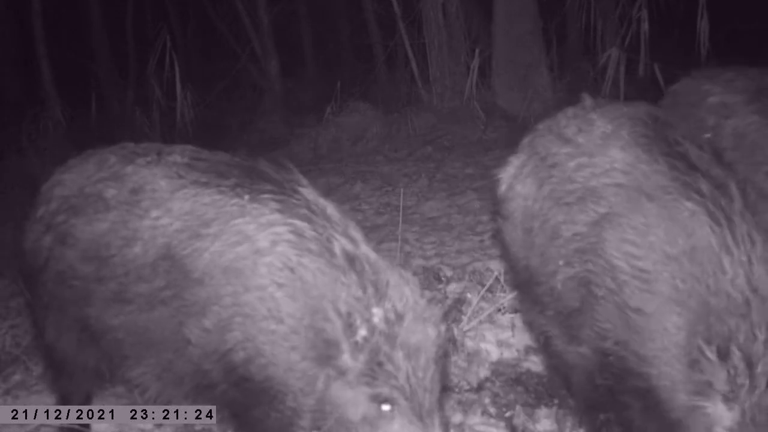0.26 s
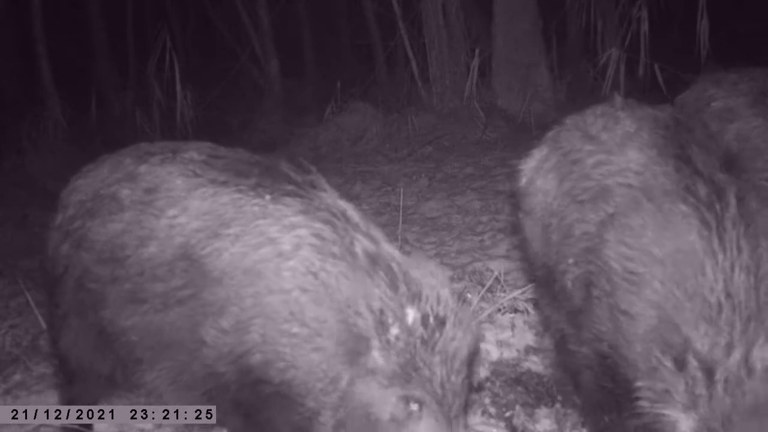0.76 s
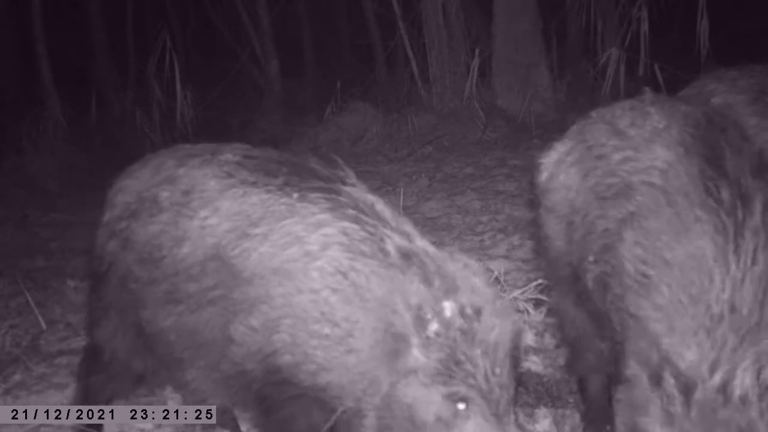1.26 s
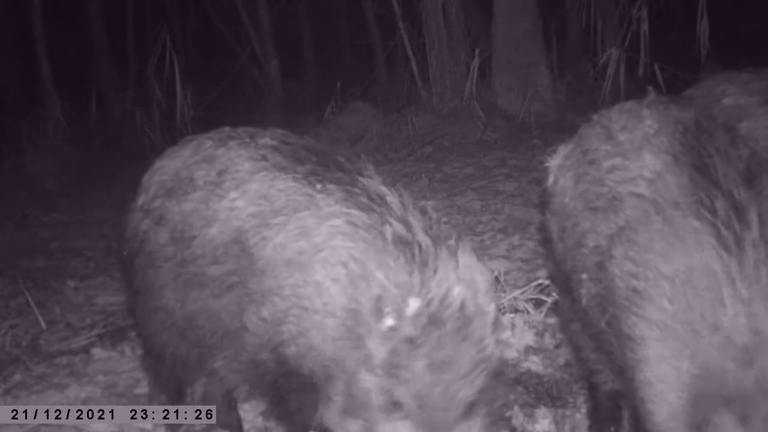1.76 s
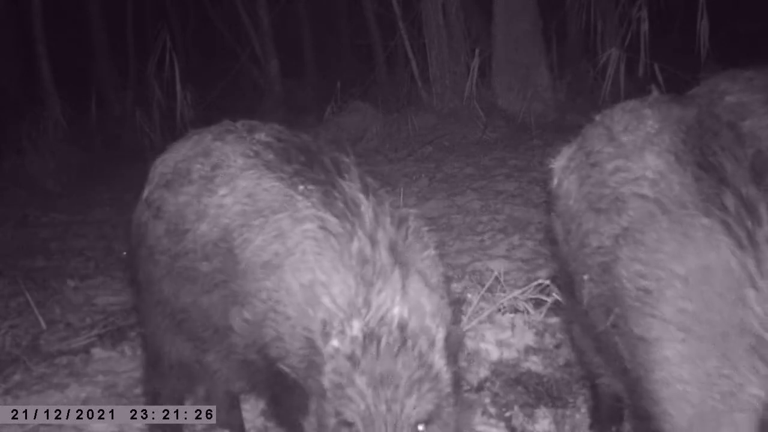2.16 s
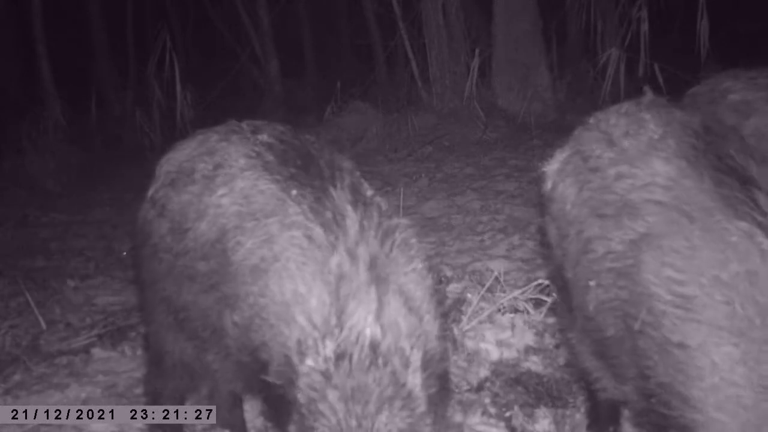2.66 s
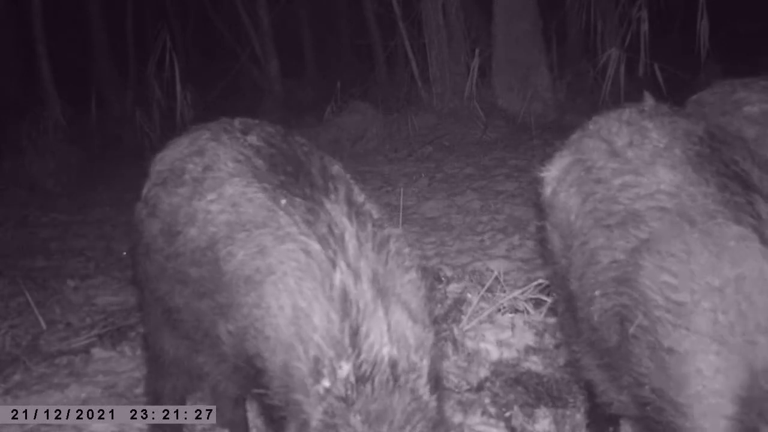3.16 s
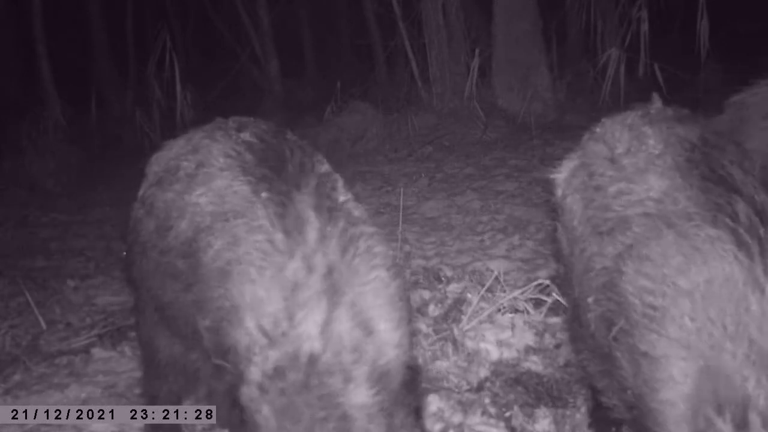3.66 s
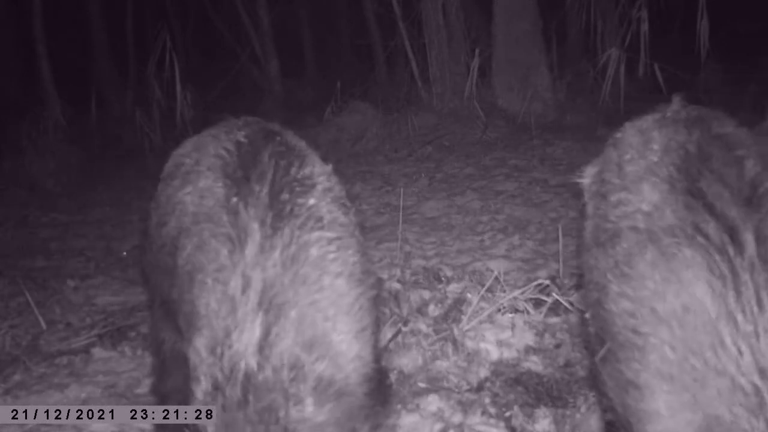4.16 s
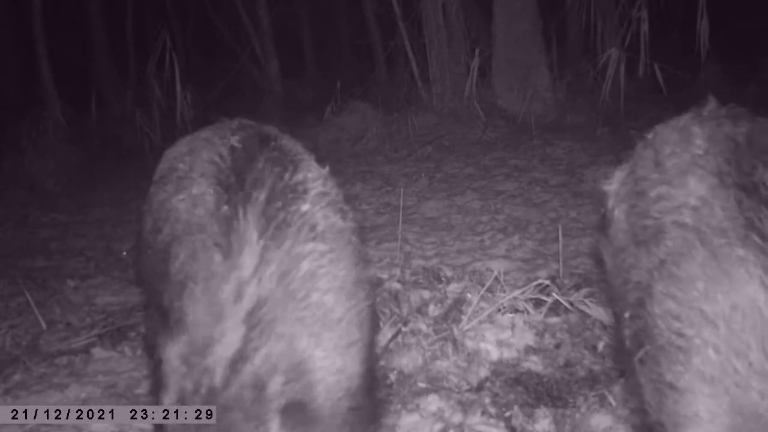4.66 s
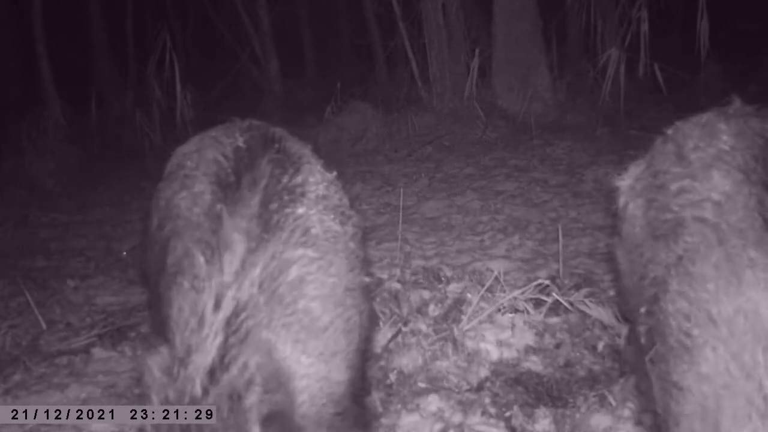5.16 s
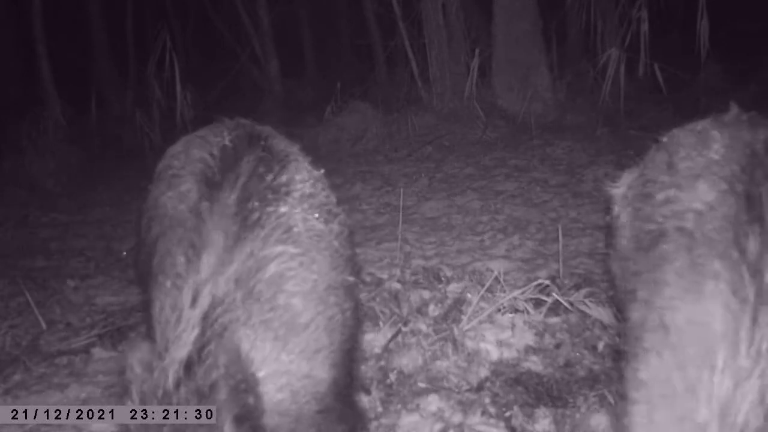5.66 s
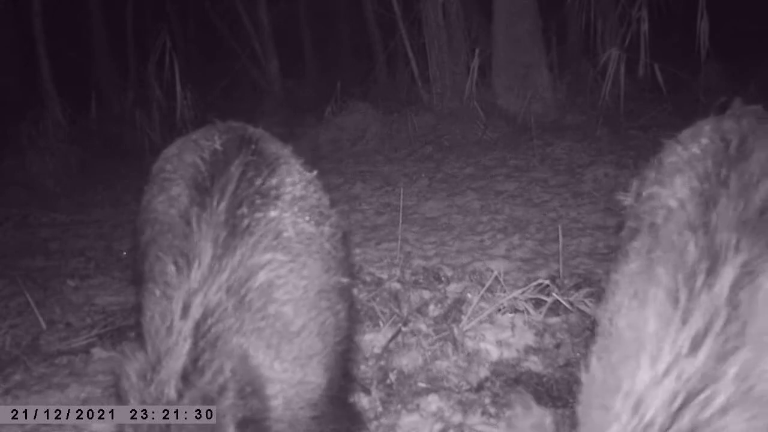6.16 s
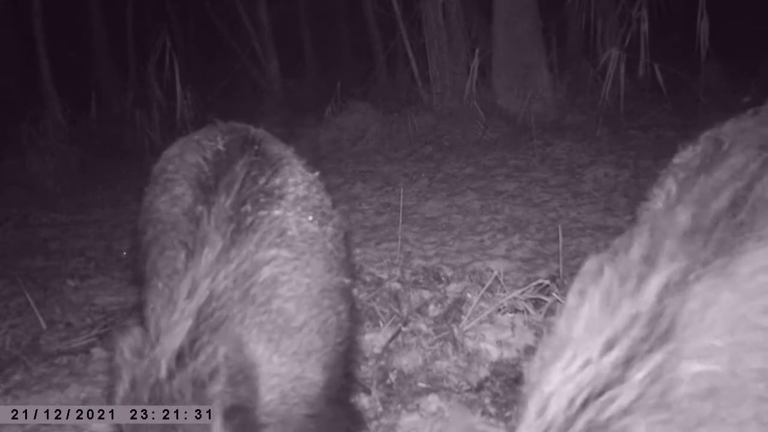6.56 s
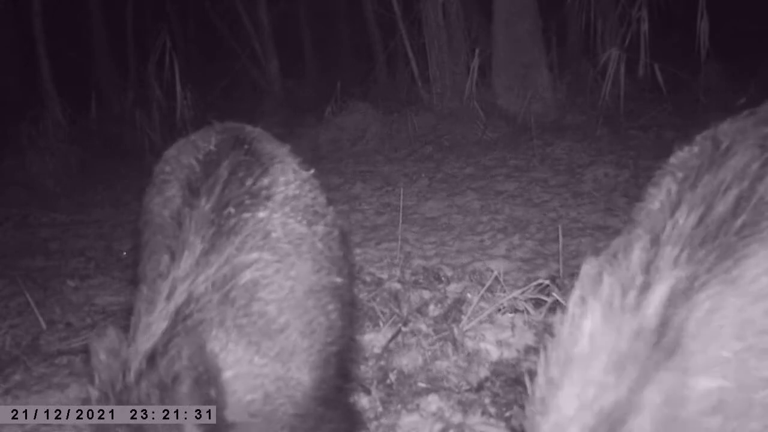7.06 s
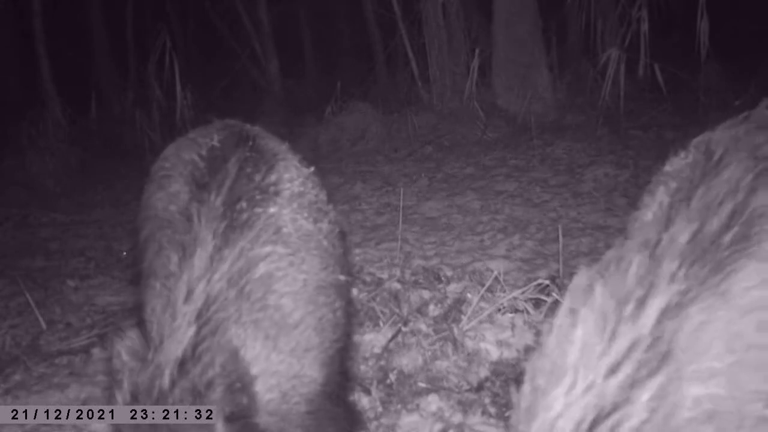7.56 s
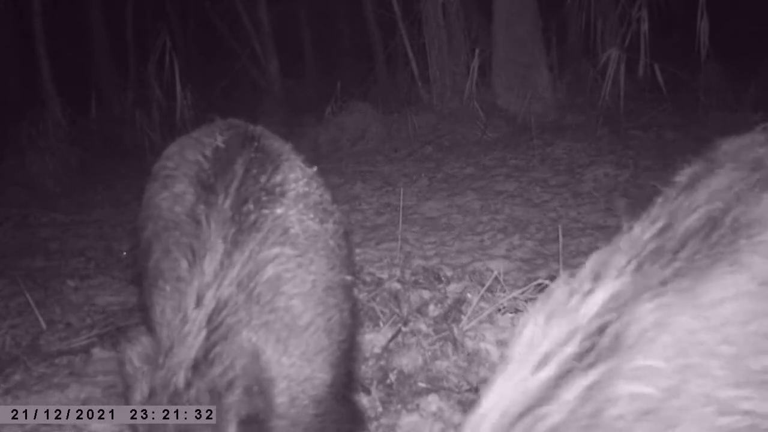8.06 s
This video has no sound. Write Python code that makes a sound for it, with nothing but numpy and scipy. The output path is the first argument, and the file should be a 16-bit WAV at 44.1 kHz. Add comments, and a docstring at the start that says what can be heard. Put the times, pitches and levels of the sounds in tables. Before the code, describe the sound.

Wild boars root in dry grass and leaf litter close to one small microphone, outdoors at night. From the start, their snouts shove the litter in short, uneven swells of fairly quiet rustling, with blades sliding and fibres crackling. Sharp, bright little snaps of stalks stand out above it, clustering around 1.4 seconds and between 2 and 3 seconds. The shoves get a little stronger from about 4 to 4.6 seconds and again at 5.5, and the loudest cluster of snaps comes at 6 seconds. After a brief lull near 7 seconds, the crumpling and snapping pick up around 7.5 and 8 seconds and carry on to the end, just past 8.3. A low rumble of night air and heavy bodies and a faint steady hiss run underneath, with soft low bumps now and then, around 1.4, 4, 6 and 8 seconds.

```python
"""Dry grass and leaf litter crackle as wild boars root close to one small microphone, outdoors at night.
Each shove of a snout crumples the litter: fibres break, blades slide and hiss, single stalks snap.
Behind it lie a low rumble of night air and heavy bodies, with soft low bumps in it now and then,
and the steady hiss of the recorder."""
import sys
import numpy as np
from scipy import signal
from scipy.io import wavfile

SR = 44100
rng = np.random.default_rng(int(sys.argv[2]) if len(sys.argv) > 2 else 0)


def master_out(mix):
    """Clip the mix to full scale and print it as 16-bit PCM to the path in sys.argv[1]."""
    frames = np.transpose(np.atleast_2d(mix))
    ceiling = np.clip(frames, -1, 1)
    pcm = np.round(ceiling * 32767).astype(np.int16)
    wavfile.write(sys.argv[1], SR, pcm)


N = 365985

# Tone of the recorder's hiss. Each row: frequency in Hz, relative level in dB.
HISS_SPECTRUM = [(100, 9.5), (300, -5), (1000, 0), (3000, -7), (7000, -11), (12000, 7), (15600, 4)]
# Tone of the rumble. Each row: frequency in Hz, relative level in dB.
RUMBLE_SPECTRUM = [(5.9, -26), (10, -9), (22, 4), (42, -2.5), (67, -7.5), (173, -22.5), (500, -38),
                   (650, -49), (1100, -120)]
# Soft low bumps in the rumble. Each row: start in seconds, peak in dB, pitch in Hz.
LOW_BUMPS = [(.59, -49.5, 59), (0.624, -52, 130), (0.969, -51, 45), (1.388, -46., 43.3),
             (1.422, -52.5, 154), (2.11, -52.5, 257), (2.449, -50, 71), (3.531, -57, 91), (4.048, -47, 60.),
             (4.28, -48, 60.), (6.016, -47.5, 85.), (7.83, -51, 74), (7.931, -46.5, 39)]
# Stalks and twigs snapping. Each row: start in seconds, peak of the bright ring in dB, its pitch in Hz,
# level of the low ring against it in dB, decay time of the splinters in milliseconds.
STALK_SNAPS = [(0.2727, -33, 8060, -27, 0.58), (0.839, -36, 6740, -25, 0.78), (0.884, -34, 5900, -27, 0.44),
               (0.893, -29, 6000, -16, 0.3), (1.233, -39.5, 6250, -9.5, 1.7),
               (1.3044, -28.5, 7700, -36, 0.5), (1.4139, -23.5, 6700, -6, 0.87),
               (1.4198, -30, 7500, -14, 0.3), (1.4688, -31, 4670, -25, 0.4), (1.49, -24.5, 5900, -12, 0.71),
               (1.4943, -27, 6200, -32, 0.64), (1.9686, -29, 7100, -15, 0.3),
               (2.0852, -32.5, 6600, -10, 0.39), (2.1081, -28.5, 6750, -7, 2.5),
               (2.113, -27.5, 6500, -12, 1.1), (2.4093, -28, 6700, -30, 0.55),
               (2.4836, -31.5, 5000, -26, 0.26), (2.6917, -30, 4900, -6, 0.3),
               (2.7763, -29, 6050, -5.5, 0.45), (2.803, -29.5, 6360, -25, 0.35),
               (2.862, -32.5, 5200, -29, 0.88), (2.961, -40, 5500, -3, 0.6),
               (3.2532, -27.5, 6160, -11, 0.48), (3.2955, -30, 6900, -22, 0.4),
               (3.667, -31, 5540, -24, 0.33), (3.6907, -34, 6200, -12, 0.9), (4.0424, -37, 7400, -19, 0.3),
               (4.407, -24.5, 5660, -27, 0.3), (4.471, -31, 5500, -21, 0.3),
               (4.484, -29.5, 7500, -11, 0.68), (4.7508, -33.5, 4700, -5, 0.3),
               (4.986, -26, 7600, -29, 0.3), (5.2719, -28, 6900, -10, 0.28), (5.4016, -35, 6340, -16, 0.7),
               (5.4782, -26, 6000, -19, 0.3), (5.4986, -31, 6400, -16, 0.6),
               (5.5114, -26.5, 5500, -29, 0.3), (5.5553, -23, 5550, -33, 0.45),
               (5.5898, -27.5, 6800, -2.5, 0.6), (5.9593, -27, 7400, -25, 0.6),
               (6.0247, -20.5, 6640, -28, 0.41), (6.0373, -22, 7000, -23, 0.4),
               (6.0436, -22, 6700, -27, 0.28), (6.106, -27, 6300, -14, 0.56), (6.2723, -37, 6600, -7, 0.3),
               (6.9613, -34, 6000, -18, 0.61), (7.0692, -40, 3930, -31, 1.2), (7.4066, -30, 7100, -24, 0.3),
               (7.4672, -23.5, 8300, -31, 0.34), (7.5017, -27.5, 6200, -21, 0.3),
               (7.546, -23.5, 6200, -25, 0.33), (7.634, -27, 6100, -27, 0.3),
               (7.8505, -46, 7600, -28, 0.37), (8.0402, -21.5, 6000, -9, 0.45),
               (8.282, -34, 6700, -10, 0.6)]
# Shoves of the snouts. Each row: moment of full strength in seconds, strength in dB,
# rise in seconds, fall in seconds.
SNOUT_SHOVES = [(0.098, -49, 0.034, 0.036), (0.132, -50.5, 0.18, 0.099), (0.338, -52, 0.07, 0.028),
                (0.39, -51.5, 0.089, 0.055), (0.502, -48, 0.12, 0.28), (0.9, -49, 0.061, 0.091),
                (0.98, -46.5, 0.13, 0.12), (1.085, -46.5, 0.11, 0.046), (1.39, -50, 0.13, 0.088),
                (1.421, -43, 0.017, 0.029), (1.495, -48, 0.13, 0.059), (1.575, -52.5, 0.055, 0.062),
                (1.679, -50.0, 0.043, 0.12), (1.91, -47, 0.04, 0.035), (1.922, -52, 0.2, 0.24),
                (2.08, -55, 0.044, 0.04), (2.118, -46.5, 0.033, 0.057), (2.404, -51.5, 0.33, 0.28),
                (2.645, -48.5, 0.033, 0.04), (2.7, -47, 0.05, 0.044), (2.834, -49.5, 0.12, 0.17),
                (3.128, -49, 0.17, 0.03), (3.3, -46.5, 0.28, 0.065), (3.446, -56, 0.16, 0.1),
                (3.545, -46.5, 0.042, 0.11), (3.763, -47.5, 0.35, 0.15), (3.924, -54.5, 0.065, 0.045),
                (4.126, -44.5, 0.19, 0.1), (4.335, -51.0, 0.18, 0.04), (4.426, -44, 0.1, 0.11),
                (4.538, -42.5, 0.11, 0.093), (4.626, -50.5, 0.023, 0.11), (4.772, -48, 0.095, 0.21),
                (4.984, -48, 0.13, 0.11), (5.048, -48, 0.027, 0.056), (5.26, -46, 0.14, 0.11),
                (5.427, -47, 0.092, 0.11), (5.506, -40.5, 0.07, 0.063), (5.573, -45.5, 0.076, 0.048),
                (5.641, -51, 0.071, 0.19), (5.93, -47.5, 0.25, 0.13), (6.089, -41.5, 0.24, 0.13),
                (6.259, -53, 0.1, 0.062), (6.51, -43, 0.13, 0.037), (6.62, -49.5, 0.19, 0.057),
                (6.751, -49, 0.13, 0.18), (6.929, -51.5, 0.21, 0.087), (7.075, -63, 0.018, 0.037),
                (7.253, -54.7, 0.14, 0.18), (7.417, -46, 0.079, 0.289), (7.551, -42, 0.017, 0.27),
                (7.963, -46, 0.42, 0.065), (8.021, -44.5, 0.062, 0.19), (8.297, -48.5, 0.24, 0.042)]
# Tone of crumpled litter at the microphone. Each row: frequency in Hz, relative level in dB.
LITTER_SPECTRUM = [(50, -18), (200, -10), (450, -11), (1000, -15), (1500, -12), (2500, -10.5), (3600, -10),
                   (5000, -7.5), (6300, -6.5), (7800, -6.5), (9500, -10.5), (12500, -11.5), (13800, -15.5),
                   (15500, -57)]

HISS_DB, RUMBLE_DB, SETTLING_DB = -68, -56.5, -60
RECORDER_LIMIT_HZ = 15740


def gain_of(db):
    """Decibels to a gain."""
    return 10 ** (np.asarray(db) / 20)


def unit_rms(x):
    """Scales to an rms of 1."""
    return x / np.sqrt(np.mean(x ** 2) + 1e-20)


def colour(x, spectrum):
    """Minimum-phase filter through (Hz, dB) points, so that clicks keep their sharp start."""
    hz, db = np.transpose(spectrum)
    grid_hz = np.abs(np.fft.fftfreq(8192, 1 / SR))
    grid_db = np.interp(np.log(grid_hz + 1), np.log(hz + 1), db)
    log_gain = np.log(gain_of(np.maximum(grid_db, -100)))
    taps = np.fft.ifft(np.exp(np.conj(signal.hilbert(log_gain)))).real[:4096]
    return signal.oaconvolve(x, taps)[:N]


def band(x, hz, kind):
    """Gentle low- or high-pass."""
    return signal.sosfilt(signal.butter(2, hz, kind, fs=SR, output="sos"), x)


def recorder_hiss():
    """The small recorder's own steady noise."""
    return gain_of(HISS_DB) * unit_rms(colour(rng.standard_normal(N), HISS_SPECTRUM))


def night_rumble():
    """Low lumpy noise of night air and heavy bodies on the ground."""
    return gain_of(RUMBLE_DB) * unit_rms(colour(rng.standard_normal(N), RUMBLE_SPECTRUM))


def low_bumps():
    """Soft low bumps in the rumble, each dying within a few cycles."""
    out, t = np.zeros(N + SR), np.arange(4000) / SR
    for start, db, hz in LOW_BUMPS:
        cycles = hz * t
        envelope = np.e * 1.5 * cycles * np.exp(-1.5 * cycles)  # peaks at 1
        out[round(start * SR):][:len(t)] += gain_of(db) * envelope * np.sin(2 * np.pi * cycles)
    return out[:N]


def stalk_snaps():
    """A sharp break and a brief spray of splinters ring a bright and a low mode of the stalk."""
    out, t = np.zeros(N + 2000), np.arange(1200) / SR
    draws = rng.standard_normal((len(STALK_SNAPS), len(t) + 1))
    for (start, db, bright_hz, low_db, decay_ms), draw in zip(STALK_SNAPS, draws):
        splinters = draw[1:] * (np.exp(-1000 * t / decay_ms) + .06 * np.exp(-t / .004))
        splinters[0] = 4  # the break itself
        low_hz = 2600 * (1 + .05 * draw[0])
        bright = np.exp(-t * 5500) * np.cos(2 * np.pi * bright_hz * t)
        low = np.exp(-t * 3200) * np.sin(2 * np.pi * low_hz * t)
        bright, low = (band(signal.fftconvolve(splinters, mode)[:len(t)], 1400, "high")
                       for mode in (bright, low))
        bright, low = band(bright, 9500, "low"), band(low, 1800, "high")
        snap = bright / abs(bright).max() + gain_of(low_db) * low / abs(low).max()
        out[round(start * SR):][:len(t)] += gain_of(db) * snap
    return out[:N]


def fibre_breaks(per_s, spread_db, cap):
    """Impulses at random moments, a few of them large, up to cap times spread_db above the smallest."""
    size_db = spread_db * np.minimum(rng.exponential(1, N), cap)
    return gain_of(size_db) * (rng.random(N) < per_s / SR)


def fibre_ticks(per_s):
    """Breaks without a pitch, each a tiny burst of noise."""
    breaks = fibre_breaks(per_s, spread_db=1.88, cap=3.5)
    burst = rng.standard_normal(60) * np.exp(-np.arange(60) / 2)
    return unit_rms(band(signal.oaconvolve(breaks, burst)[:N], 10000, "low"))


def fibre_crackle(per_s, decay_cycles=3.3, pitches=24):
    """Tiny breaks that each ring for a few cycles at their own pitch."""
    breaks = fibre_breaks(per_s, spread_db=2.1, cap=4)
    pitch_index = rng.integers(0, pitches, N)
    out, t = np.zeros(N), np.arange(400) / SR
    for k, hz in enumerate(np.geomspace(500, 14000, pitches)):
        ring = np.exp(-t * hz / decay_cycles) * np.cos(2 * np.pi * hz * t)
        ring *= np.sqrt(hz) / np.linalg.norm(ring)  # equal energy for every Hz
        out += signal.oaconvolve(breaks * (pitch_index == k), ring)[:N]
    return unit_rms(out)


def shove_strength_db(sharpness=1.82):
    """Each shove of a snout swells and lets go, over a steady floor of settling litter."""
    t = np.arange(0, N, 32) / SR
    power = np.full(len(t), gain_of(SETTLING_DB) ** 2)
    for peak_s, db, rise_s, fall_s in SNOUT_SHOVES:
        push = np.interp(t, [peak_s - rise_s, peak_s, peak_s + fall_s], [0, 1, 0])
        power += (gain_of(db) * np.sin(np.pi / 2 * push) ** sharpness) ** 2
    return np.interp(np.arange(N) / SR, t, 10 * np.log10(power))


def litter_rustle():
    """Close to the microphone, sliding blades and breaking fibres tremble together under the snouts."""
    shove_db = shove_strength_db()
    tremble_db = 1.4 * unit_rms(band(rng.standard_normal(N), 30, "low"))
    breaks_per_s = 1500 * gain_of(.4 * (shove_db + 52.5))  # a harder shove breaks more fibres
    ticks = fibre_ticks(.3 * breaks_per_s)
    sliding = rng.standard_normal(N)
    breaking = gain_of(-7.5) * fibre_crackle(breaks_per_s) + gain_of(-5) * ticks
    breaking /= np.sqrt(breaks_per_s / breaks_per_s.mean())  # density alone adds no loudness
    rustle = unit_rms(colour((sliding + breaking) * gain_of(tremble_db), LITTER_SPECTRUM))
    big_leaves, fizz = band(rustle, 3400, "low"), band(rustle, 7640, "high")
    fizz_gain = gain_of(-.2 * (shove_db + 70))  # hard shoves crush deep litter and sound duller
    rustle += (gain_of(-.5) - 1) * big_leaves + (fizz_gain - 1) * fizz
    deep = signal.sosfiltfilt(signal.butter(2, 1500, fs=SR, output="sos"), rustle)
    deep_gain = gain_of(-.45 * (shove_db + 57))  # the dull part under the leaves grows less than the rest
    rustle += (deep_gain - 1) * deep
    return gain_of(shove_db) * rustle


def scene():
    """One microphone close to the boars feeds both channels."""
    mono = litter_rustle() + stalk_snaps() + low_bumps() + night_rumble() + recorder_hiss()
    return np.tile(mono, (2, 1))


def record(dry):
    """The recorder cuts off the highest treble steeply."""
    low_pass = signal.firwin(1023, RECORDER_LIMIT_HZ, window=("kaiser", 9), fs=SR)
    return signal.oaconvolve(dry, low_pass[None], "same")


dry = scene()
out = record(dry)
master_out(out)
```